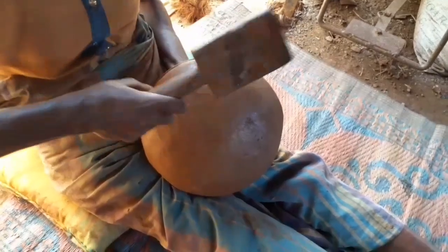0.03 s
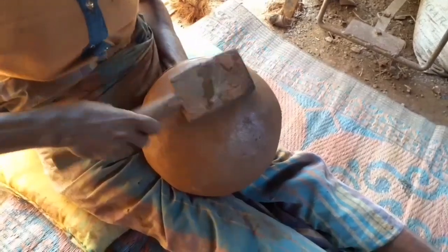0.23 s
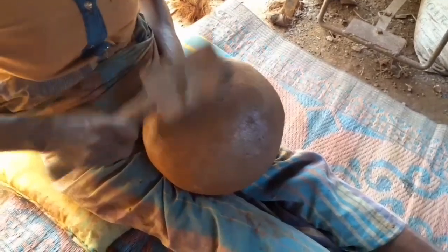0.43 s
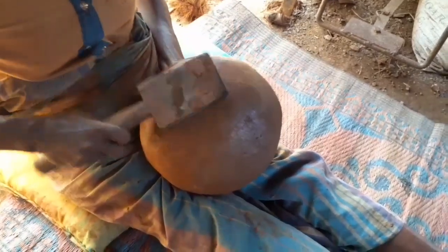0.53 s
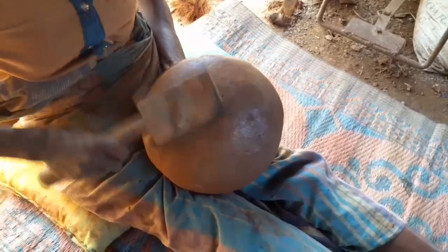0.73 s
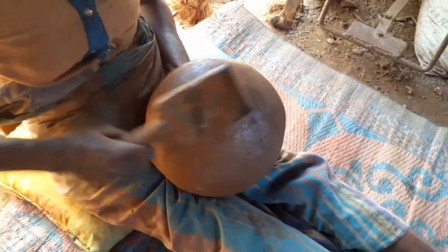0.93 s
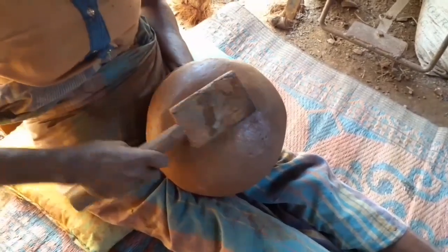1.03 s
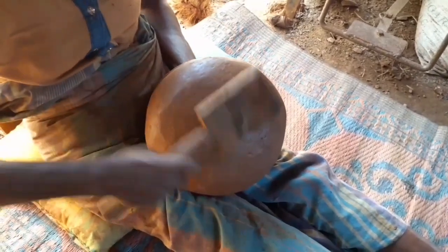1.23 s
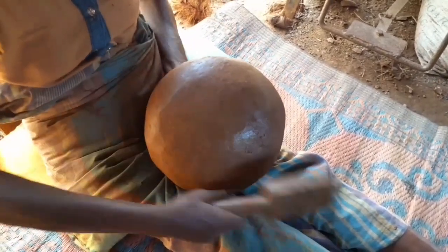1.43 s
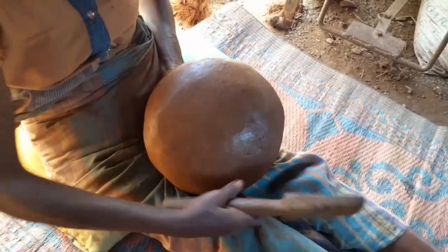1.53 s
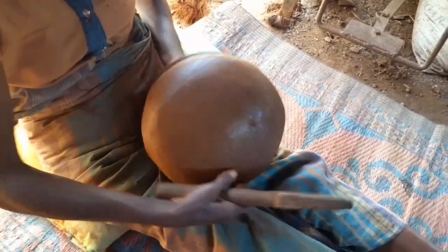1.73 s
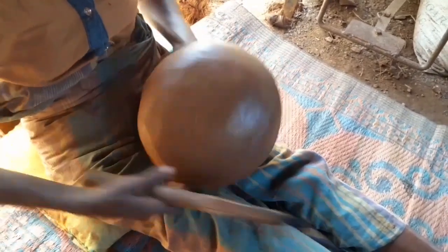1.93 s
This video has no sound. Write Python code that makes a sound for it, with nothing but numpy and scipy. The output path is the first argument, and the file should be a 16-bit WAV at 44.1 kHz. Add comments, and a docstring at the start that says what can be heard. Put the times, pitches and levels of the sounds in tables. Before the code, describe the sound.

A wooden paddle beats a damp clay pot five times close to the microphone, each sharp slap carrying a hollow thump and brief yard echo. A distant bird chirps at first; soft handling bumps follow the last blow.

```python
"""Paddling a clay pot in a yard

Near the microphone, in a sheltered yard, a potter beats a round clay pot steadily with a flat wooden
paddle. Each blow is a sharp slap of wood on damp clay and a quick hollow thump, thrown back by nearby
walls. A distant bird chatters at the start; a low outdoor rumble lies under everything."""
import sys
import numpy as np
from scipy import signal
from scipy.io import wavfile
from scipy.ndimage import uniform_filter1d

SR = 44100
rng = np.random.default_rng(int(sys.argv[2]) if len(sys.argv) > 2 else 0)


def store_wav(level_fs):
    """Save 16-bit WAV to argv[1]."""
    pcm = np.round(np.clip(np.atleast_2d(level_fs), -1, 1) * 32767)
    wavfile.write(sys.argv[1], SR, pcm.T.astype(np.int16))


N = 2 * SR


def amp(db):
    """Decibels to gain."""
    return 10 ** (np.asarray(db) / 20)


def unit_rms(x):
    """Scales to an rms of one."""
    return x / np.sqrt(np.mean(x ** 2) + 1e-20)


def unit_energy(x):
    """Scales each channel to an energy of one."""
    return x / np.linalg.norm(x, axis=-1, keepdims=True)


def read(points, hz):
    """Reads a table on a log-frequency axis."""
    f, value = np.transpose(points)
    return np.interp(np.log(hz + 1), np.log(f + 1), value)


def pan(left_db):
    """Channel gains for a source left_db louder on the microphone's left."""
    return amp(np.array([[left_db / 2], [-left_db / 2]]))


def add(mix, start_s, sound):
    """Adds a sound into the mix, dropping what falls outside it."""
    at = round(start_s * SR)
    sound = sound[..., max(-at, 0):]
    part = mix[:, max(at, 0):][:, :sound.shape[-1]]
    part += sound[..., :part.shape[1]]


def convolve(x, response):
    """Convolves channel by channel."""
    return signal.fftconvolve(np.atleast_2d(x), np.atleast_2d(response), axes=1)[:, :N]


def colour(x, db_of, size=2048):
    """Minimum-phase filter with the gain curve db_of(hz)."""
    log_gain = np.log(amp(db_of(abs(np.fft.fftfreq(size, 1 / SR)))))
    spectrum = np.exp(np.conj(signal.hilbert(log_gain)))
    return convolve(x, np.fft.ifft(spectrum).real[:size // 2])


def low_cut(x, hz):
    """Second-order high-pass."""
    return signal.sosfilt(signal.butter(2, hz, "high", fs=SR, output="sos"), x)


def mode(hz, t60, rise_s):
    """One damped vibration that swells briefly and dies."""
    t = np.arange(SR // 2) / SR
    return np.sin(2 * np.pi * hz * t) * amp(-60 * t / t60) * (1 - np.exp(-t / rise_s))


# Likeness of diffuse sound at the microphone's two sides: f/Hz, coherence/0-1
COHERENCE = [(60, 1), (290, 0.85), (640, 0.57), (1400, 0.0036), (15000, 0)]

def diffuse_noise(length, db_of, size=512):
    """Stereo noise, alike in the bass, shaped by db_of(hz, t)."""
    frames = dict(fs=SR, nperseg=size, noverlap=size - size // 4)
    hz, t, bins = signal.stft(rng.standard_normal((2, length)), **frames)
    coherence = read(COHERENCE, hz)[:, None]
    bins[1] = coherence * bins[0] + np.sqrt(1 - coherence ** 2) * bins[1]
    return signal.istft(bins * amp(db_of(hz[:, None], t)), **frames)[1][:, :length]


def burst(decay_s, size=2048):
    """A dying crowd of tiny contacts, of unit energy."""
    t = np.arange(size) / SR
    envelope = np.exp(-t / decay_s) * (1 - np.exp(-10 * t / decay_s))
    return unit_energy(diffuse_noise(size, lambda hz, t: 0) * envelope)


# Spectrum of the open air around the yard: f/Hz, relative level/dB
AIR_SPECTRUM = [(20, -45.5), (35, -10.5), (50, -12.5), (75, -3.5), (100, 3.5), (160, -13.5), (210, -2),
                (270, -25), (400, -26), (560, -29), (670, -20), (820, -31.5), (1400, -32), (2400, -34),
                (3500, -45.5), (5500, -51), (7500, -51.5), (9000, -42), (12000, -53.5), (16000, -51.5)]
# Drift of the distant rumble: t/s, relative level/dB
RUMBLE_DRIFT = [(0, 0.5), (.42, 5), (.6, -0.5), (.75, -1.5), (1.0, 0), (1.2, -3.5), (1.45, -2),
                (1.75, -1.5), (2, -0.5)]
# Drift of the hiss: t/s, relative level/dB
HISS_DRIFT = [(0, 7.5), (.45, 6.5), (.7, 3), (1.1, 1.5), (1.4, 0.5), (1.65, 0.5), (1.85, 3.5), (2, 3)]

def outdoor_air(level_db=-47, split_hz=400, patch_db=2):
    """Distant rumble and thin hiss from all around, each drifting in level."""
    def field_db(hz, t):
        low_share = 1 / (1 + (hz / split_hz) ** 2)
        rumble = low_share * np.interp(t, *np.transpose(RUMBLE_DRIFT))
        hiss = (1 - low_share) * np.interp(t, *np.transpose(HISS_DRIFT))
        patches = uniform_filter1d(rng.standard_normal((len(hz), len(t))), size=30, axis=0)
        patches = unit_rms(uniform_filter1d(patches, size=6, axis=1))
        return read(AIR_SPECTRUM, hz) + rumble + hiss + patch_db * patches
    return amp(level_db) * pan(0.66) * unit_rms(diffuse_noise(N, field_db, size=2048))


def insect(level_db=-64.5, start_s=1.85, rise_s=0.08, centre_hz=11040, half_width_hz=510):
    """A thin high buzz, barely reaching the microphone, sets in near the end."""
    buzz = diffuse_noise(N, lambda hz, t: -20 * np.log10(1 + ((hz - centre_hz) / half_width_hz) ** 2))
    fade_in = np.clip((np.arange(N) / SR - start_s) / rise_s, 0, 1)
    return amp(level_db) * unit_rms(buzz) * fade_in


# Tones from far off: t/s, f/Hz, sag/(Hz per s), level/dB, pitch waver/fraction, length/s
WHISTLE_TONES = [(0.22, 1065, 50, -64, .003, .26), (1.52, 3480, 1000, -74, .03, .06),
                 (1.60, 3120, 900, -75, .03, .14)]

def far_whistles():
    """Faint, far tones that swell and fade as their pitch sinks."""
    out = np.zeros((2, N))
    for start_s, hz, sag, db, waver_depth, length_s in WHISTLE_TONES:
        t = np.arange(0, length_s, 1 / SR)
        waver = unit_rms(uniform_filter1d(rng.standard_normal(SR), size=80))[:len(t)]
        pitch_hz = (hz - sag * t) * (1 + waver_depth * waver)
        swell = np.sqrt(abs(np.sin(np.pi * t / length_s)))
        add(out, start_s, amp(db) * swell * np.sin(2 * np.pi * np.cumsum(pitch_hz) / SR))
    return out


# Calls of a bird some way off to the right: t/s, relative level/dB
BIRD_CALLS = [(-0.005, -48.5), (0.095, -47.5), (0.197, -47), (0.305, -49)]
# Spectrum of the rasp that ends each call: f/Hz, relative level/dB
RASP_SPECTRUM = [(1500, -24), (3000, -5.5), (4000, -10.5), (4650, -2.5), (5600, -1.5), (6300, -5.5),
                 (6650, 5), (6900, -22.5), (7200, -50)]

def bird(from_hz=3450, to_hz=4794, sweep_s=0.04, rasp_at_s=0.026, rasp_s=0.049, tail_t60=0.47):
    """Each call slides upward and breaks into a rasp; distance smears the calls together."""
    calls = np.zeros((2, N))
    sweep_progress = np.linspace(0, 1, int(sweep_s * SR))
    sweep_swell = np.sqrt(sweep_progress * (1 - sweep_progress))
    glide_hz = from_hz + (to_hz - from_hz) * np.sin(np.pi / 2 * sweep_progress)
    rasp_progress = np.linspace(0, 1, int(rasp_s * SR))
    rasp_swell = unit_rms(np.sqrt(rasp_progress) * (1 - rasp_progress))
    for start_s, db in BIRD_CALLS:
        jitter, breath = rng.standard_normal((2, SR // 2))
        jitter = unit_rms(uniform_filter1d(jitter, size=24))[:len(glide_hz)]
        pitch_hz = glide_hz * (1 + 0.083 * jitter)
        chirp = unit_rms(np.sin(2 * np.pi * np.cumsum(pitch_hz) / SR) * sweep_swell)
        rasp = unit_rms(colour(breath, lambda hz: read(RASP_SPECTRUM, hz)))[:, :len(rasp_swell)]
        add(calls, start_s, amp(db) * chirp)
        add(calls, start_s + rasp_at_s, amp(db) * rasp * rasp_swell)
    tail = unit_energy(diffuse_noise(SR, lambda hz, t: -60 * t / tail_t60))
    return pan(-3.5) * (amp(-6.5) * calls + amp(-2) * convolve(calls, tail))


# Early decay of the sheltered yard: f/Hz, t60/s
YARD_DECAY = [(200, 0.29), (530, 0.2246), (1400, 0.39), (3700, 0.43), (9700, 0.26), (15000, 0.33)]
# Colour of what the yard returns to the microphone: f/Hz, gain/dB
YARD_SPECTRUM = [(100, -12), (400, -5), (1400, -7.5), (4000, -7.5), (7200, -3), (8600, -5.5), (11000, 1.5),
                 (15000, 2)]

def yard(x, build_s=0.00096, hold_s=0.06, drop_db_per_s=220):
    """Short diffuse reverberation that drops away once the nearby walls have answered."""
    def decay_db(hz, t):
        return -60 * t / read(YARD_DECAY, hz) - drop_db_per_s * np.maximum(t - hold_s, 0)
    build_up = 1 - np.exp(-np.arange(SR // 2) / SR / build_s)
    tail = unit_energy(diffuse_noise(SR // 2, decay_db, size=256) * build_up)
    return colour(convolve(x, tail), lambda hz: read(YARD_SPECTRUM, hz))


# Ticks of grit and paddle, close by: t/s, relative level/dB, left over right/dB
GRIT_TICKS = [(0.715, -20, 0), (1.1120, -18.5, 0)]
# Spectrum of a tick: f/Hz, gain/dB
TICK_SPECTRUM = [(300, -3), (2700, -23.5), (6500, -19.5), (8800, 7), (11000, -7), (15000, -11)]
# Soft bumps of the turning pot: t/s, level/dB, f/Hz, t60/s
POT_BUMPS = [(0.954, -39, 115.6, 0.8), (1.601, -41.5, 417, 0.048), (1.893, -34, 98, 0.17)]

def handling(tick_decay_s=0.0034, yard_db=-2):
    """Small ticks and soft bumps while the pot is turned in the lap."""
    out = np.zeros((2, N))
    for start_s, db, left_db in GRIT_TICKS:
        tick = amp(db) * pan(left_db) * colour(burst(tick_decay_s), lambda hz: read(TICK_SPECTRUM, hz))
        add(out, start_s, tick)
        add(out, start_s, amp(yard_db) * yard(tick))
    for start_s, db, hz, t60 in POT_BUMPS:
        add(out, start_s, amp(db) * mode(hz, t60, rise_s=0.012))
    return out


def slap(right_lag_s=0.00006, contact_cutoff_hz=4810):
    """The paddle face lands, squashes the clay's skin, and the crack scatters off the potter's body."""
    squash = amp(1) * burst(decay_s=0.0015)
    scatter = amp(-5) * burst(decay_s=0.0069)
    arrival_samples = 10 + np.array([[0], [right_lag_s * SR]])
    impulse = np.sinc(np.arange(squash.shape[1]) - arrival_samples)
    contact = amp(2.5) * signal.lfilter(*signal.butter(1, contact_cutoff_hz, fs=SR), impulse)
    return squash + scatter - contact


# Spectrum of wood on damp clay, heard close: f/Hz, gain/dB
SLAP_SPECTRUM = [(60, -21), (200, -1), (500, 13), (750, -0.5), (950, 3.5), (1300, 2.5), (2300, -1),
                 (4500, -1), (6200, -5), (7500, -9), (8400, 3.5), (9500, 0.5), (11000, -4.5), (15000, -13),
                 (16500, -33)]

def slap_colour(crack, bright_hz, lift_db, treble_db, mid_db):
    """How flatly the paddle lands sets the slap's spectrum."""
    def hump(hz, centre_hz, octaves):
        return np.exp(-(np.log2((hz + 1) / centre_hz) / octaves) ** 2)

    def gain_db(hz):
        lift = lift_db * hump(hz, bright_hz, octaves=0.62)
        mid = mid_db * hump(hz, centre_hz=1250, octaves=1)
        treble = treble_db * (1 + np.tanh((hz - 6900) / 900)) / 2  # shelf above 6.9 kHz
        return read(SLAP_SPECTRUM, hz) + lift + mid + treble
    return colour(crack, gain_db)


def knock(wood_db, wood_hz, clay_db):
    """The wooden paddle and the clay wall's upper mode ring briefly."""
    wood = amp(wood_db) * mode(wood_hz, t60=0.08, rise_s=0.00084)
    clay = amp(clay_db) * mode(hz=589, t60=0.025, rise_s=0.00079)
    return wood + clay


# Modes of the hollow pot: f/Hz, relative level/dB, t60/s
POT_MODES = [(178, -36, 0.07), (216.9, -9.5, 0.097), (246.5, -15, 0.15), (296.3, -18, 0.15),
             (322.8, -17.5, 0.2), (379.3, -24, 0.12), (452.7, -21, 0.12), (586.4, -27.5, 0.03),
             (732, -36, 0.031)]

def thump(push_hz):
    """The soft wall gives under the paddle and sets the hollow pot ringing."""
    push = amp(12) * mode(push_hz, t60=0.017, rise_s=0.0034)
    ring = sum(amp(db) * mode(hz, t60, rise_s=0.0016) for hz, db, t60 in POT_MODES)
    return low_cut(push + ring, hz=190)


# Echoes of the thump off the nearby walls: delay/s, gain/dB
WALL_ECHOES = [(.0100, -29), (0.0266, -18)]
# Paddle blows near the microphone, levels relative: t/s, thump/dB, thump f/Hz, slap/dB,
# slap's bright band f/Hz, lift there/dB, slap's treble/dB, slap's left over right/dB,
# slap into the yard/dB, wood knock/dB, wood f/Hz, clay's upper mode/dB, slap's midrange/dB
PADDLE_BLOWS = [(-0.070, -7, 307, 2, 3370, -5.5, -2.5, -1, -4, -46, 1100, -55, -3),
                (0.2073, -7.5, 317, -2.5, 3200, 9, 1.5, -0.5, -2, -39, 1165, -15, -2.5),
                (0.4930, -10.5, 308, -2.5, 4100, 4, -4, -2.5, -3.5, -34, 1110, -20, -3.5),
                (0.7699, -12.5, 280, -5, 5600, 10.5, 2.5, -7, -1, -37, 1114, -30.5, 0),
                (1.0305, -16, 269, -1, 3900, 2.5, 0, 0.5, -3, -37, 1025, -24.5, 1),
                (1.2780, -11.5, 367, -5, 2000, -4, 3, 3, -4, -38, 981, -18.5, 3.5)]

def paddle(thump_lag_s=0.0018, body_left_db=1.5, body_yard_db=-6.5, yard_lift_share=0.32):
    """Each blow sends a slap, a knock and a thump straight to the microphone and round the yard."""
    out = np.zeros((2, N))
    for (start_s, thump_db, thump_hz, slap_db, bright_hz, lift_db, treble_db, slap_left_db,
         slap_yard_db, wood_db, wood_hz, clay_db, mid_db) in PADDLE_BLOWS:
        crack = amp(slap_db) * slap()
        direct_slap = slap_colour(crack, bright_hz, lift_db, treble_db, mid_db)
        # The slap's echo is more even in colour than its direct sound.
        yard_slap = slap_colour(crack, bright_hz, yard_lift_share * lift_db, treble_db, mid_db)
        add(out, start_s, pan(slap_left_db) * direct_slap)
        add(out, start_s, amp(slap_yard_db) * yard(yard_slap))
        # Knock and thump give the blow its body.
        direct_knock = pan(body_left_db) * knock(wood_db, wood_hz, clay_db)
        direct_thump = pan(body_left_db) * amp(thump_db) * thump(thump_hz)
        thump_s = start_s + thump_lag_s
        add(out, start_s, direct_knock)
        add(out, thump_s, direct_thump)
        add(out, thump_s, amp(body_yard_db) * yard(direct_thump + direct_knock))
        for delay_s, db in WALL_ECHOES:
            add(out, thump_s + delay_s, amp(db) * direct_thump)
    return out


def scene():
    """Everything that reaches the microphone in the yard, from near to far."""
    return paddle() + handling() + bird() + far_whistles() + insect() + outdoor_air()


def record(dry, low_cut_hz=36, band_limit_hz=16000):
    """The microphone's low cut and the recorder's band limit."""
    low_pass = signal.firwin(255, band_limit_hz, window=("kaiser", 9), fs=SR)
    return signal.oaconvolve(low_cut(dry, low_cut_hz), low_pass[None], "same")


dry = scene()
out = record(dry)
store_wav(out)
```